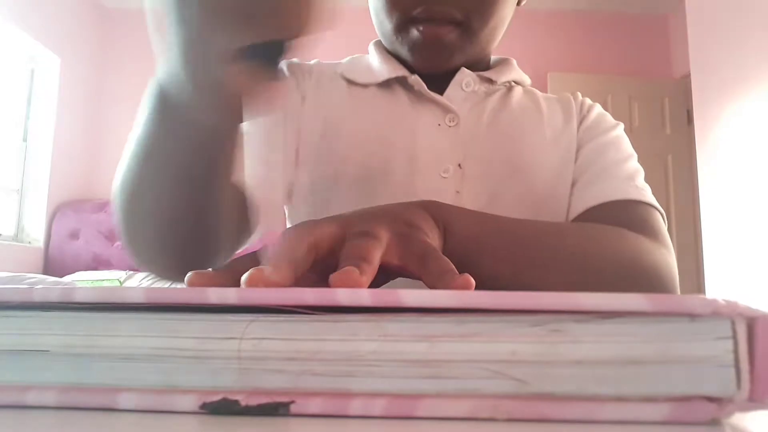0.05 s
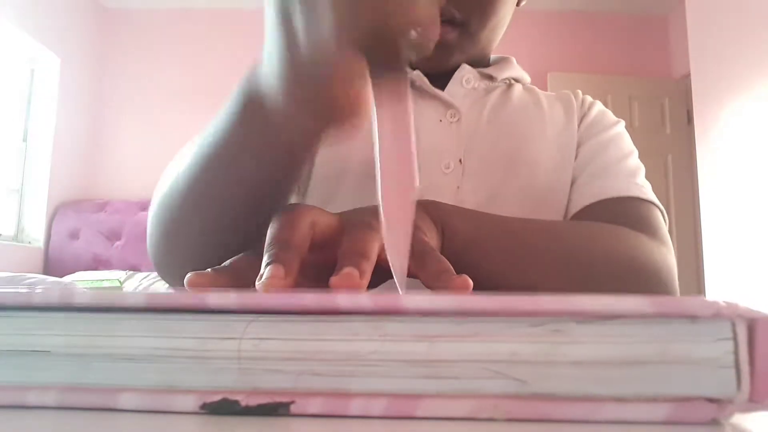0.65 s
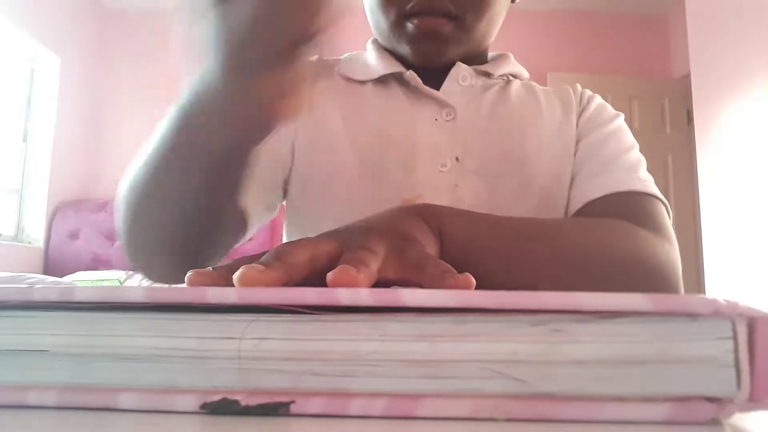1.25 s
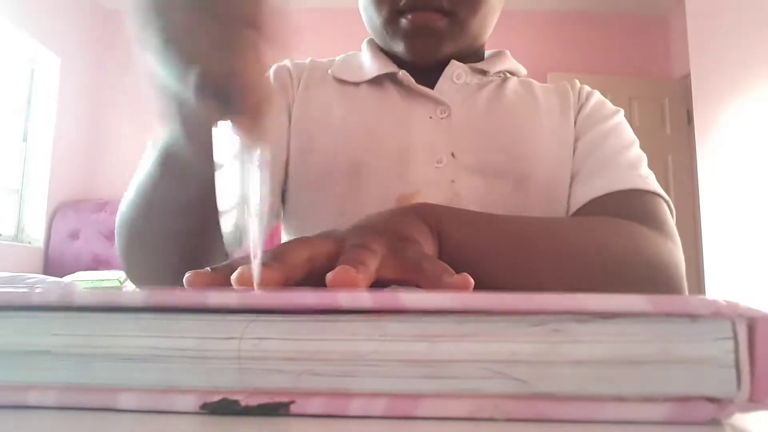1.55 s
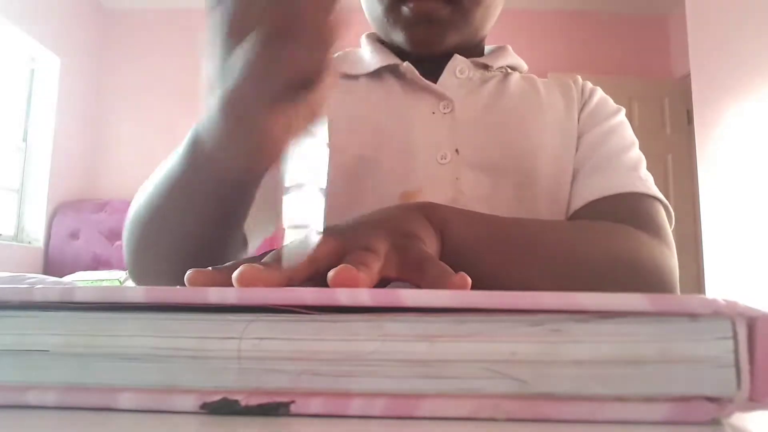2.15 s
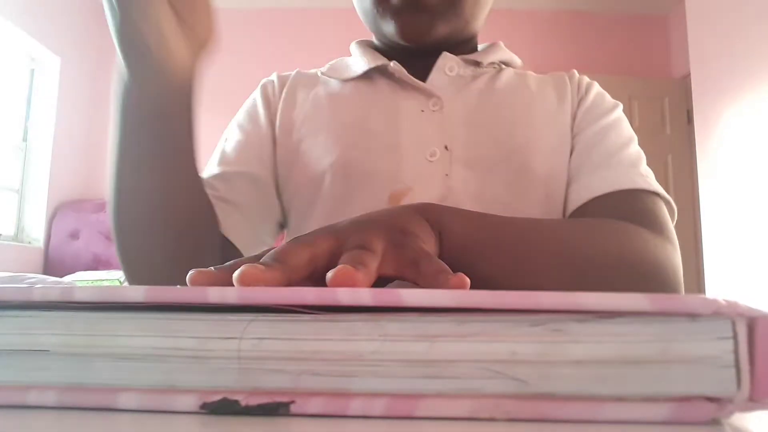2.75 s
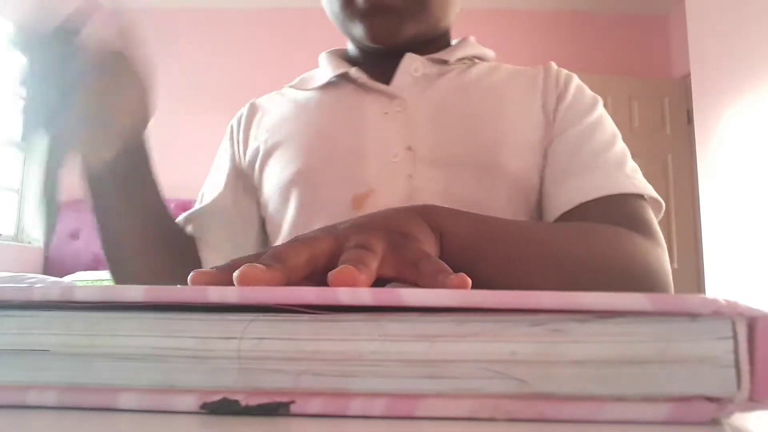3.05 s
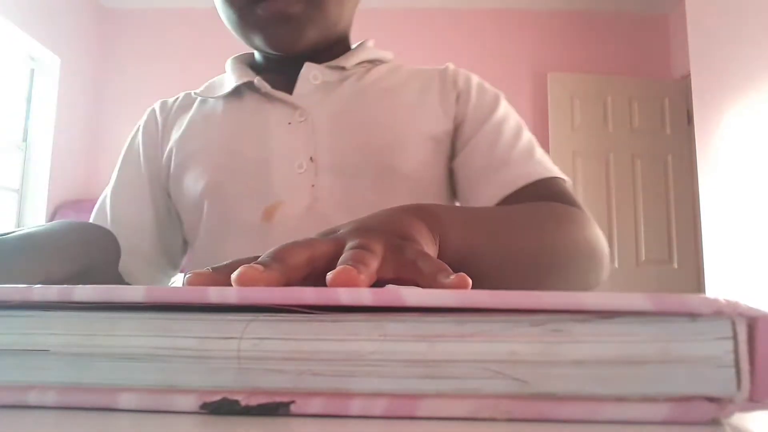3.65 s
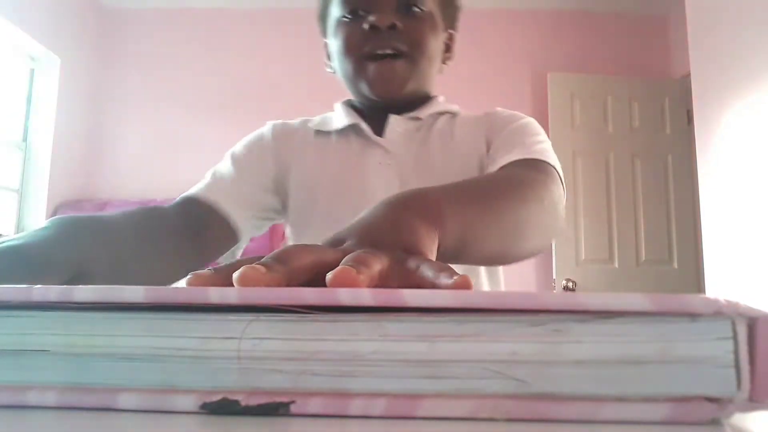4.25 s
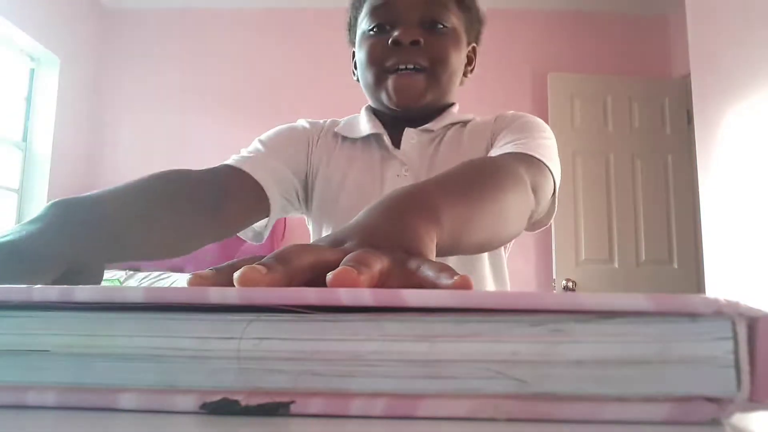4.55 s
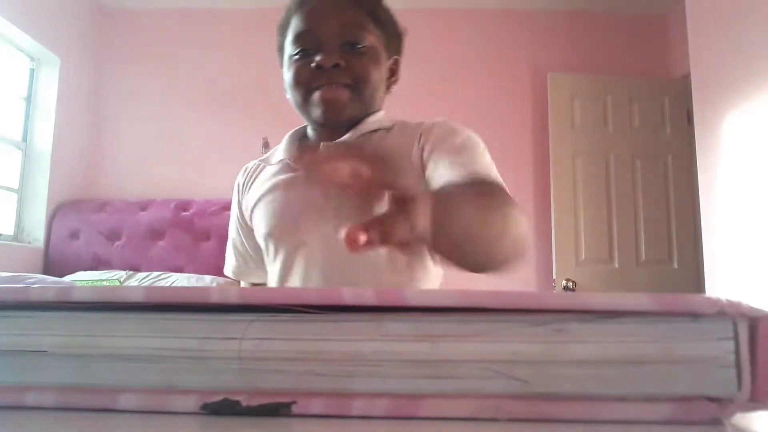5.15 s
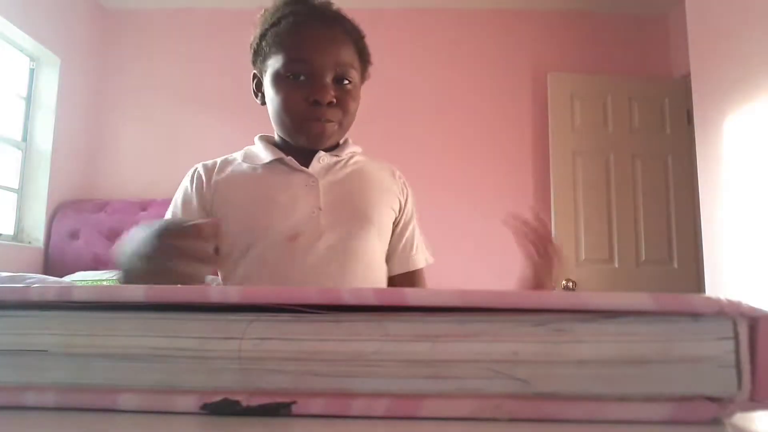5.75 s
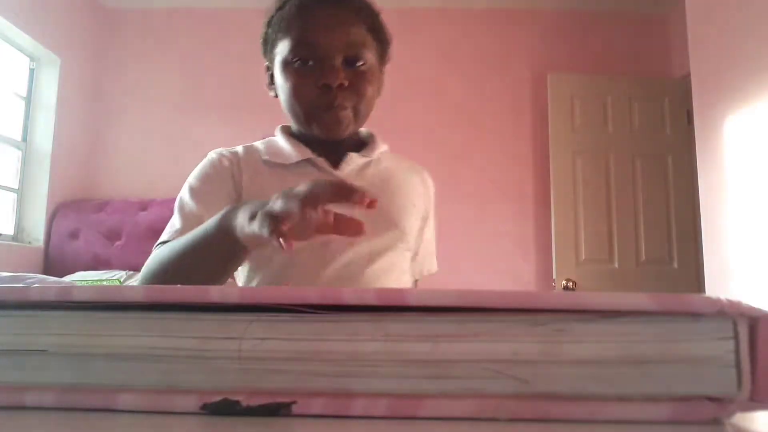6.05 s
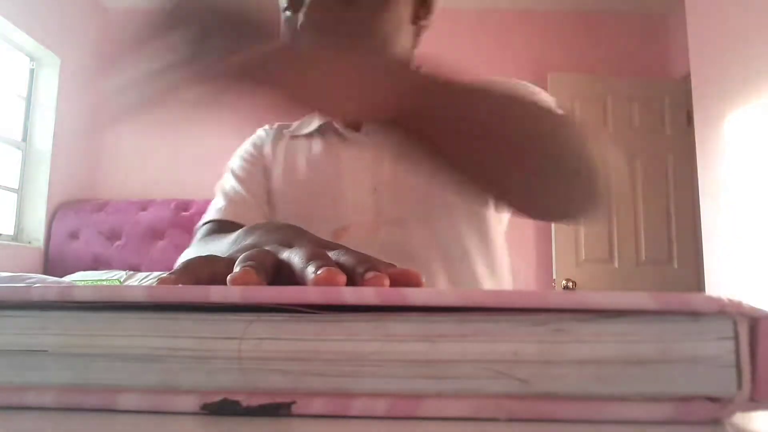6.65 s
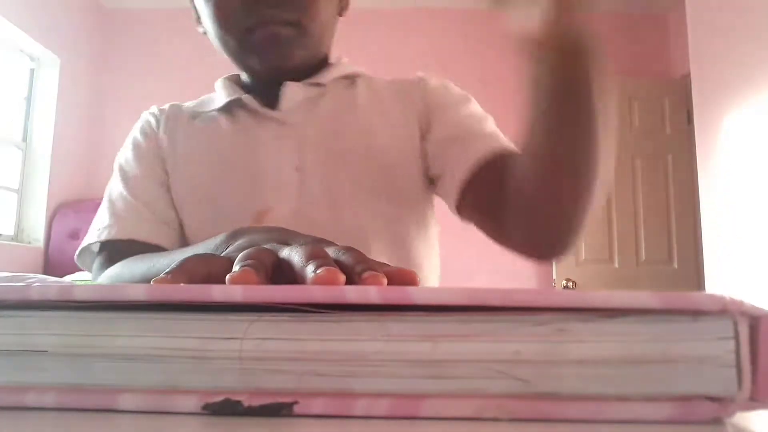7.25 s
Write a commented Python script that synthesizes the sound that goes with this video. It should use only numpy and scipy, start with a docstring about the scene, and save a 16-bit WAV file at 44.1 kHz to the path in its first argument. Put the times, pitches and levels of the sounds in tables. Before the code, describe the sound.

From the start until about 2.5 seconds, a knife point stabs a thick hardcover book fifteen times, evenly, about six a second, close to a phone microphone in a small room. Each hit combines a sharp tick, a thump and a short ring from the table, with a tiny scratchy creak as the point pulls free. Then it turns much quieter. An arm bumps the table softly at 3.1 seconds, a sleeve brushes at 3.3, and the knife taps lightly at 3.5. Around 4.5 seconds the knife is laid down further off, with a dull clatter that quickly rocks to rest. Faint cloth brushing follows around 5 to 5.4 seconds, then tiny taps and soft thuds between 6.1 and 6.8. At 6.8 seconds two hard knocks, almost together, ring the phone's case, slightly to the right. A last faint brush comes near 7.4. Faint room noise and hum continue throughout.

```python
"""In a small room, just in front of a phone, a knife is stabbed fifteen times into a thick book on a table.
Each impact ticks on the hard cover, thumps the book and excites the table's modes; a moment later
stick-slip friction creaks as the point is pulled free. Then arms bump and brush about, the knife is
laid down further off and rocks to rest, and two knocks close by ring the phone's case.
Faint room noise and a hum lie beneath it all."""
import sys
import numpy as np
from scipy import signal
from scipy.fft import rfft, irfft
from scipy.io import wavfile

SR = 44100
rng = np.random.default_rng(int(sys.argv[2]) if len(sys.argv) > 2 else 0)


def file_out(sig):
    """Save sig as 16-bit WAV at sys.argv[1]."""
    # one column per channel
    cols = np.atleast_2d(sig).T
    # limit, then scale
    lim = np.clip(cols, -1, 1)
    pcm = np.round(lim * 32767).astype(np.int16)
    wavfile.write(sys.argv[1], SR, pcm)


N = 326781

# blows of the point, with levels relative to each part's own gain:
# (time [s], thump [dB], cover tick [dB], crack [dB], table boom [dB], sticking time [s])
STABS = [(.0358, -6, -6, -7, 3.5, 0.0063), (0.2061, -3.5, -8, -1, 5.5, 0.0035),
         (.3529, -9.5, -6, -5.5, 2.5, 0.0023), (0.5404, -1.5, -12.5, -1.5, 4, 0.022),
         (0.7214, -7, -3.5, -1, 3.5, 0.0025), (0.8908, -1, -6, 0.5, 4.5, 0.015),
         (1.0763, -3, -3.5, -3.5, -2.5, 0.0032), (1.2484, 1, -7, 2.5, 1.5, 0.024),
         (1.4369, -1, -3, -2, -2.5, 0.0049), (1.6101, 0.5, -6, -1.5, -4, 0.023),
         (1.8121, -3.5, -17, -6, -5.5, 0.0059), (1.9756, -2.5, -2.5, -11, -2.5, 0.0014),
         (2.1497, -2.5, -7.5, -2.5, 4, 0.022), (2.3063, -3.5, -7, -4, -8.5, .013),
         (2.4722, 0, -8, -2.5, -5.5, .015)]


def undb(db):
    """Amplitude ratio of a level in decibels."""
    return 10 ** (np.asarray(db) / 20)


def seconds(length):
    """Sample times over length seconds."""
    return np.arange(int(length * SR)) / SR


def add(track, s, sound):
    """Superposition: a sound joins the track at time s."""
    start = max(int(s * SR), 0)
    count = min(sound.shape[-1], N - start)
    track[..., start:start + count] += sound[..., :count]


def high_pass(x, hz):
    """Second-order Butterworth filter: attenuates the bass below hz."""
    return signal.sosfilt(signal.butter(2, hz, "high", fs=SR, output="sos"), x + 1e-18)


def colour(x, spectrum):
    """Spectral shaping by (frequency [Hz], level [dB]) points, normalised to rms 1."""
    hz, db = np.transpose(spectrum)
    bins = np.fft.rfftfreq(x.shape[-1], 1 / SR)
    gain = undb(np.interp(np.log(bins + 1), np.log(hz), db))
    shaped = irfft(rfft(x) * gain, x.shape[-1])
    return shaped / shaped.std()


def diffuse(count, spacing_m=0.17):
    """Diffuse-field noise at two microphone ports: coherent in the bass, incoherent in the treble."""
    coherence = np.sinc(2 * np.fft.rfftfreq(count, 1 / SR) * spacing_m / 343)
    mid, side = rfft(rng.standard_normal((2, count))) * np.sqrt([1 + coherence, 1 - coherence])
    return irfft(np.array([mid + side, mid - side]), count) / np.sqrt(2)


def ring(modes, t, pitch=1):
    """Free vibration: a sum of exponentially damped modes."""
    return sum(undb(db - 60 * t / t60) * np.sin(2 * np.pi * hz * pitch * t) for hz, db, t60 in modes)


def burst(spectrum, t, decay_s):
    """A transient of coloured noise with exponential decay."""
    return colour(rng.standard_normal(len(t)), spectrum) * np.exp(-t / decay_s)


def place(x, pan_db, lag_ms):
    """Level and arrival-time cues of direction: positive values favour the left port."""
    lag = int(round(abs(lag_ms) * SR / 1000))
    far = np.concatenate([np.zeros(lag), x])[:N]
    return np.array([x, far] if lag_ms > 0 else [far, x]) * undb([[pan_db / 2], [-pan_db / 2]])


def room(x, wet_db, t60_low, t60_high, build_s):
    """Reverberation: convolution with a diffuse tail whose bass and treble decay at their own rates."""
    t = seconds(.6)
    reverb = 0
    # as the source moves about, one pattern of reflections gives way to another
    spot = 2 * np.pi * 1.3 * np.arange(N) / SR
    for share in np.cos(spot), np.sin(spot):
        noise = diffuse(len(t))
        low = signal.sosfilt(signal.butter(2, 1500, fs=SR, output="sos"), noise)
        high = high_pass(noise, 1150)
        tail = low * undb(-60 * t / t60_low) - high * undb(-60 * t / t60_high)
        tail *= 1 - np.exp(-(t / build_s) ** 2)
        tail /= np.sqrt(np.sum(tail ** 2) / 2)
        reverb += signal.fftconvolve((share * x.mean(0))[None], tail, axes=1)[:, :N]
    return undb(wet_db) * reverb


def air(noise_db=-50):
    """Ambient noise: a diffuse field that flickers slightly, and a hum wavering by phase modulation."""
    # room noise: (frequency [Hz], relative level [dB])
    spectrum = [(25, -30), (50, -14), (80, -7.5), (135, -0.5), (230, -6.5), (350, -9), (680, -10),
                (1400, -18), (2100, -20.5), (2800, -29), (3300, -34), (10300, -46), (11500, -33),
                (15500, -42)]
    # tones of the hum: (frequency [Hz], rms level [dB])
    tones = [(59.5, -64), (142, -59.5), (290, -61.5), (361, -63.5)]
    t = np.arange(N) / SR
    knots = np.linspace(0, N / SR, 60)
    *drifts, flicker = [np.interp(t, knots, row) for row in rng.standard_normal((len(tones) + 1, 60))]
    hum = sum(undb(db) * np.sqrt(2) * np.sin(2 * np.pi * hz * t + 1.75 * drift)
              for (hz, db), drift in zip(tones, drifts))
    return colour(diffuse(N), spectrum) * undb(noise_db + .5 * flicker) + hum


def stabs(pitch_spread=0.036, scatter_db=3.5, thump_centre_s=0.00203):
    """Impact excitation: the point ticks on the cover, the book gives and rebounds, the table rings."""
    # modes of the cover, the point clacking on its board, and the table's low and high ranges:
    # (frequency [Hz], relative level [dB], T60 [s])
    cover_modes = [(865, -15.5, 0.028), (1698, -16.5, 0.014)]
    clack_modes = [(1947, -24, 0.012), (2023, -15.5, 0.014)]
    low_modes = [(75.4, -39, 0.41), (137, -39, 0.11), (147.2, -32, 0.28), (176.5, -25, 0.098),
                 (204.5, -28, 0.14), (256.2, -34.5, 0.19)]
    high_modes = [(363, -46, 0.7), (414, -46, 0.25), (489, -60, 0.68), (560, -58, 0.4), (687, -23.5, 0.16),
                  (867, -24.5, 0.2), (915, -38, 0.54), (913, -26.5, 0.074), (1050, -37, 0.31)]
    # crack of the point: (frequency [Hz], relative level [dB])
    crack_spectrum = [(1200, -4), (2500, -15.5), (3600, 11), (4700, 7.5), (6700, -2), (7800, 0.5),
                      (9700, -13), (12000, 4), (14000, 0), (16000, -3)]
    # early reflections: (delay [s], gain [ratio])
    echoes = [(.0074, 0.15), (0.0103, -0.072), (0.0142, 0.12)]
    ticks, cover, thumps, cracks, table = np.zeros((5, N))
    t, t_table = seconds(.04), seconds(.4)
    tick = np.exp(-((t - .0004) / .00019) ** 2)
    boom = ring(low_modes, t_table)
    # every spot on the cover has its own pitch
    pitches = 1.002 + pitch_spread * rng.standard_normal(len(STABS))
    for (s, thump_db, tick_db, crack_db, boom_db, _), pitch in zip(STABS, pitches):
        add(ticks, s, undb(tick_db - 3.5) * tick)
        add(cover, s + .0001, undb(tick_db + 0.5) * ring(cover_modes, t, pitch))
        add(cover, s + 0.00046, undb(crack_db - 2) * ring(clack_modes, t, pitch))
        thump_hz = 436 + 6.5 * thump_db  # a harder stab meets a stiffer book
        swing = 2 * np.pi * thump_hz * (t - thump_centre_s)
        add(thumps, s, undb(thump_db + 3.5) * swing * np.exp(-swing ** 2 / 2))
        crack = burst(crack_spectrum, t, decay_s=0.0014) * (1 - np.exp(-t / 0.0017))
        add(cracks, s + 0.00021, undb(crack_db - 25) * crack)
        add(table, s + 0.0026, undb(boom_db) * boom)
        # each stab drives the table's upper modes in new proportions
        shares_db = scatter_db * rng.standard_normal(len(high_modes))
        knock = sum(undb(db) * ring([mode], t_table) for mode, db in zip(high_modes, shares_db))
        add(table, s + 0.00141, undb(thump_db - 1) * knock)
    direct = place(ticks, pan_db=2.5, lag_ms=.07) + place(cover, pan_db=0.5, lag_ms=.11)
    direct += place(thumps, pan_db=3.5, lag_ms=0.26) + place(cracks, pan_db=1.5, lag_ms=.02)
    direct = high_pass(direct, hz=105)  # the direct sound of each stab carries little deep bass
    early = direct + place(high_pass(table, hz=76), pan_db=1.0, lag_ms=0.24)
    for delay, gain in echoes:
        add(early, delay, gain * direct * undb([[1.5], [-1.5]]))
    reverb = room(direct, wet_db=-7.0, t60_low=0.18, t60_high=0.3, build_s=0.0036)
    return early + high_pass(reverb, hz=108)


def pulls(pull_after_s=.0235, release_s=.0051, slips_per_s=5000):
    """Stick-slip friction: after each stab, random slips scratch at the point and creak in the cover."""
    # scratching point, creaking cover and sliding blade: (frequency [Hz], relative level [dB])
    scratch_spectrum = [(1500, 24.5), (2800, 14), (3400, 1.5), (4500, 10.5), (6500, -13), (7800, 4),
                        (9700, -21), (12000, 8), (14500, 3), (16000, -29)]
    creak_spectrum = [(50, -45), (130, -22), (300, -9), (520, 0), (880, -2), (1300, -14), (2000, -20),
                      (3500, -37)]
    blade_spectrum = [(1800, -29), (2400, -3), (2700, 3.5), (3200, -21), (4500, -16), (5300, -23),
                      (7800, -16), (10000, -16), (14800, -14), (16000, -24)]
    # the blade scrapes once as it slides out: (time [s], level [dB], decay [s])
    scrape = (0.091, -40.5, 0.031)
    scratch, creak = np.zeros((2, N))
    t = seconds(.15)
    for s, thump_db, *_, stick_s in STABS:
        slips = (rng.random(len(t)) < slips_per_s / SR) * rng.standard_normal(len(t))
        grip = np.minimum(t / (0.16 * stick_s), 1) * np.exp(-np.maximum(t - stick_s, 0) / release_s)
        scratch_db = -44 + 230 * stick_s  # a point that sticks longer scratches louder
        add(scratch, s + pull_after_s, undb(scratch_db) * grip * colour(slips, scratch_spectrum))
        add(creak, s + pull_after_s, undb(thump_db - 32) * grip * colour(slips, creak_spectrum))
    s, db, decay_s = scrape
    add(scratch, s, undb(db) * burst(blade_spectrum, t, decay_s) * (1 - np.exp(-t / 0.0077)))
    direct = place(scratch, pan_db=4.5, lag_ms=.05) + place(creak, pan_db=3.5, lag_ms=0.29)
    return direct + room(direct, wet_db=-4, t60_low=.24, t60_high=.34, build_s=.005)


def arm_bumps():
    """Soft impacts: arms meet the table slowly, so their thuds carry little treble."""
    # bumps on the table: (time [s], level [dB], roll-off frequency [Hz])
    bumps = [(3.093, -33, 507), (6.294, -33, 354), (6.31, -28, 303), (6.736, -29, 212), (6.77, -33, 226)]
    thuds, t = np.zeros(N), seconds(0.22)
    for s, db, hz in bumps:
        spectrum = [(40, -24), (120, 0), (hz, -3), (2 * hz, -20), (8 * hz, -55)]
        add(thuds, s, undb(db) * burst(spectrum, t, decay_s=0.011) * (1 - np.exp(-t / 0.0016)))
    return place(thuds, pan_db=0.0, lag_ms=-0.48)


def sleeves(grain_samples=150, grain_db=2.5):
    """Friction noise: brushing cloth catches and slips many times a second."""
    # strokes of a sleeve: (time [s], half length [s], level [dB])
    strokes = [(3.3, 0.016, -46), (4.982, 0.11, -54.5), (5.345, 0.12, -57), (6.302, 0.017, -51.5),
               (7.393, 0.047, -56)]
    # rubbing cloth: (frequency [Hz], relative level [dB])
    spectrum = [(200, -6), (900, 0), (2100, 0), (3200, -9), (3900, -7), (5500, -19), (8000, -20),
                (10000, -27), (14000, -25)]
    t = np.arange(N) / SR
    envelope = sum(undb(db) * np.exp(-((t - s) / half) ** 2) for s, half, db in strokes)
    grains = undb(grain_db * rng.standard_normal(N // grain_samples + 1))
    catches = np.repeat(grains, grain_samples)[:N]
    return envelope * colour(catches * diffuse(N), spectrum)


def rocking(landings, s, first_db=-11.5, loss_db=7, gap_s=.095, gap_ratio=.93):
    """Inelastic collisions: from time s, each landing is sooner, weaker and has fewer contacts."""
    chatter_s, jitter_s, pitch_spread = .0052, 0.000504, 0.042
    contacts = []
    for k in range(landings):
        for j, (jitter, bend) in enumerate(rng.standard_normal((landings - k, 2))):
            when = s + j * chatter_s + jitter_s * jitter
            contacts.append((when, first_db - k * loss_db, 1 + pitch_spread * bend))
        s += gap_s * gap_ratio ** k
    return contacts


def knife_clatter():
    """Modal ringing: the knife taps and rocks to rest, dull in the acoustic shadow of the book."""
    # modes of the knife: (frequency [Hz], relative level [dB], T60 [s])
    modes = [(221, -22.5, 0.13), (580, -15, 0.076), (740, -3.5, 0.021), (836, -8, 0.028), (1073, -1, 0.019),
             (1420, -10.5, 0.024), (1663, -8.5, 0.028), (1970, -15, 0.057), (2210, -16, 0.055)]
    # light single taps: (time [s], level [dB], pitch [ratio])
    taps = [(3.4884, -19, .9), (4.4367, -10.5, .9), (6.146, -30, 0.9), (6.284, -32.5, 1.2)]
    ringing, t = np.zeros(N), seconds(.2)
    for s, db, pitch in taps + rocking(landings=4, s=4.501):
        add(ringing, s, undb(db) * ring(modes, t, pitch) * (1 - np.exp(-t / 0.00083)))
    shadowed = signal.sosfilt(signal.butter(4, 2800, fs=SR, output="sos"), ringing)
    direct = place(shadowed, pan_db=-1.2, lag_ms=-.25)
    return direct + room(direct, wet_db=-13, t60_low=0.16, t60_high=0.091, build_s=0.009)


def knocks():
    """Structure-borne sound: two hard knocks ring the phone's case and reach the right port first."""
    # blows next to the phone: (time [s], ring level [dB], crack level [dB])
    blows = [(6.795, -9, -29), (6.8241, -15, -27.5)]
    # modes of the case: (frequency [Hz], relative level [dB], T60 [s])
    modes = [(203, -7.5, 0.035), (659, -14.5, 0.079), (860, 6.5, 0.015), (1036, -2, 0.023),
             (1774, -2, .018), (1930, -15, 0.016), (2740, -1, 0.014), (2860, -11, 0.017), (4400, -30, .008),
             (8000, -18, 0.014)]
    # crack of the contact: (frequency [Hz], relative level [dB])
    spectrum = [(2000, -18), (4500, 4), (6000, -7), (7700, -1.5), (9500, -9), (11500, 2), (14800, -3),
                (16000, 2)]
    body, cracks, t = np.zeros(N), np.zeros(N), seconds(.2)
    for s, ring_db, crack_db in blows:
        add(body, s, undb(ring_db) * ring(modes, t) * (1 - np.exp(-t / 0.001)))
        add(cracks, s, undb(crack_db) * burst(spectrum, t, decay_s=0.0036))
    body = place(body, pan_db=-4.5, lag_ms=-.45)
    cracks = place(cracks, pan_db=-11, lag_ms=-.45)
    airborne = 0.47 * body + cracks  # most of the ringing comes through the case
    return body + cracks + room(airborne, wet_db=-5, t60_low=0.24, t60_high=0.24, build_s=0.0037)


def scene():
    """Superposition of all sources at the two ports."""
    return stabs() + pulls() + knife_clatter() + knocks() + arm_bumps() + sleeves() + air()


def record(dry, ceiling=1.1, top_hz=15600):
    """Band limiting and soft saturation: the phone drops deep bass, rounds peaks and cuts the top."""
    x = high_pass(dry, hz=39.0)
    rounded = x / (1 + (x / ceiling) ** 6) ** (1 / 6)
    return signal.sosfilt(signal.ellip(8, .2, 70, top_hz, fs=SR, output="sos"), rounded)


dry = scene()
out = record(dry)
file_out(out)
```